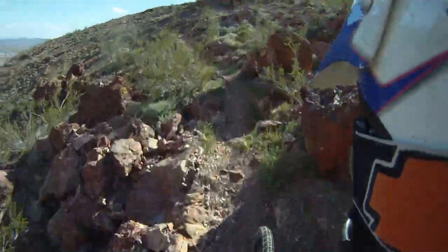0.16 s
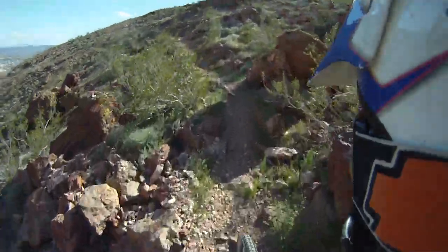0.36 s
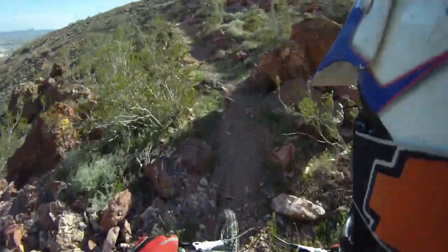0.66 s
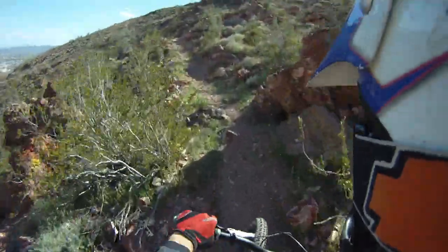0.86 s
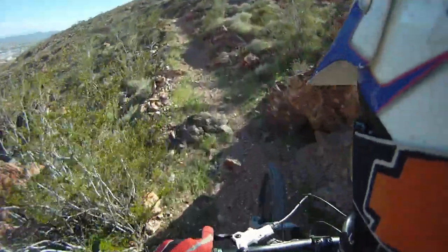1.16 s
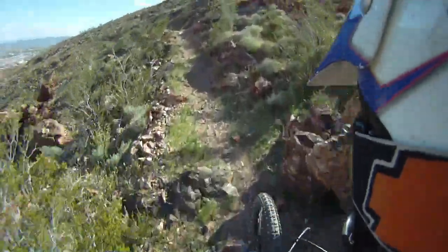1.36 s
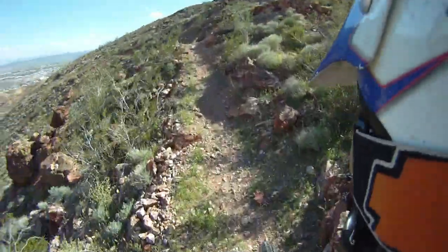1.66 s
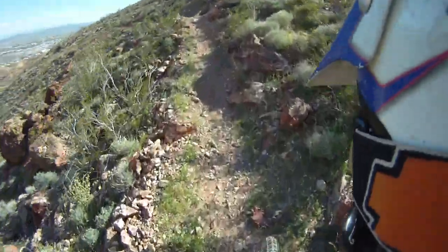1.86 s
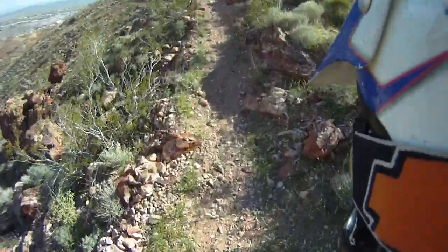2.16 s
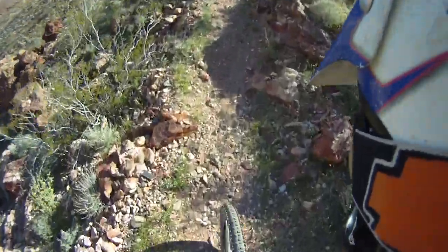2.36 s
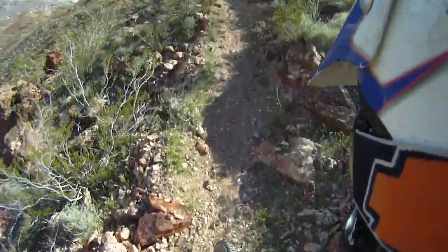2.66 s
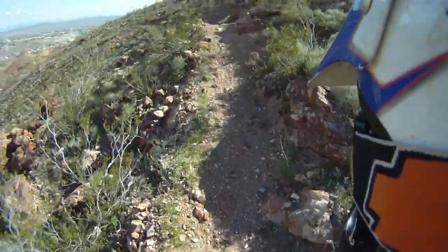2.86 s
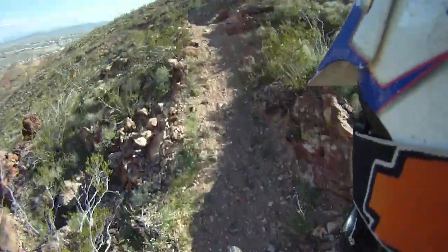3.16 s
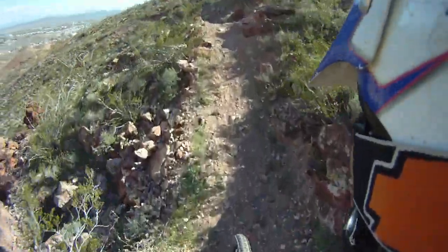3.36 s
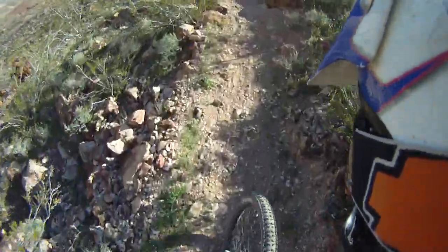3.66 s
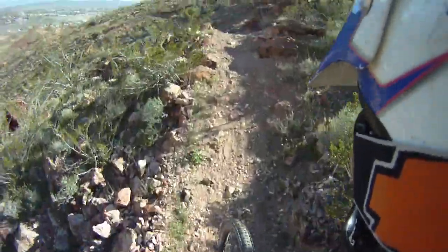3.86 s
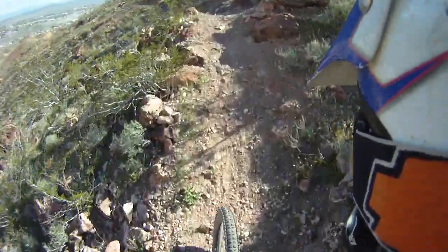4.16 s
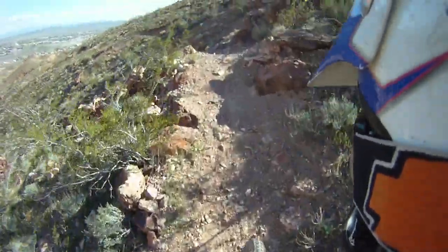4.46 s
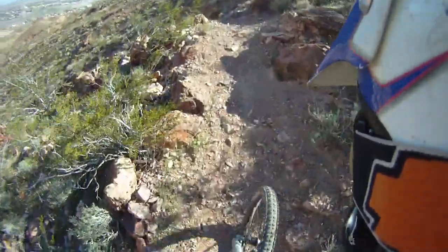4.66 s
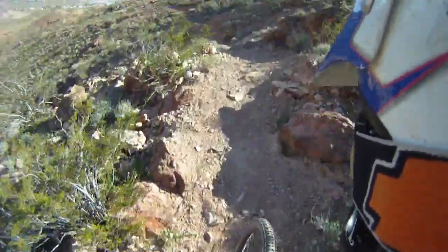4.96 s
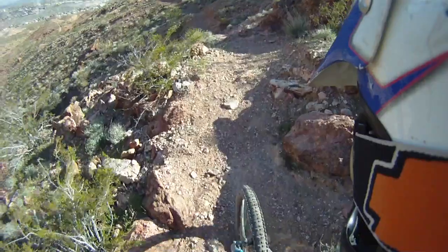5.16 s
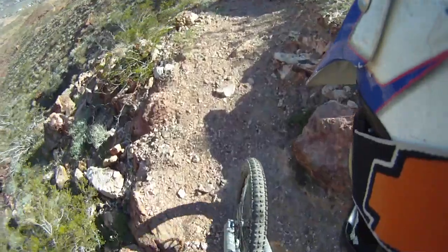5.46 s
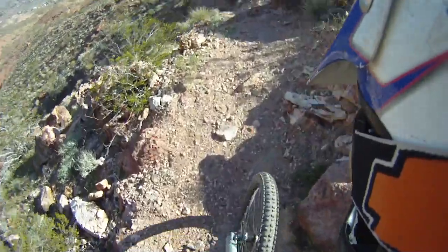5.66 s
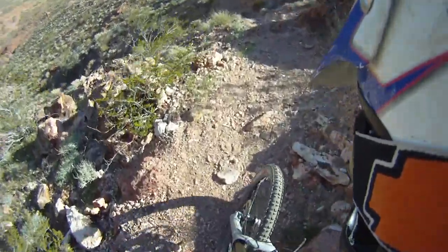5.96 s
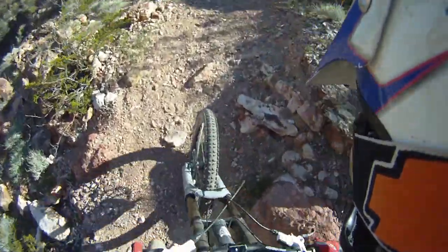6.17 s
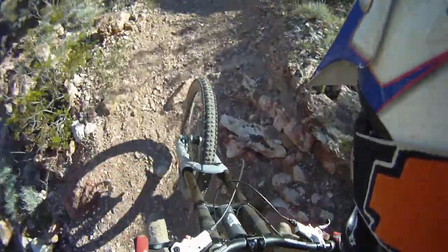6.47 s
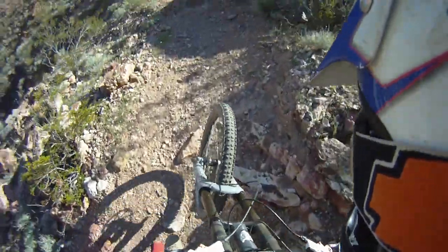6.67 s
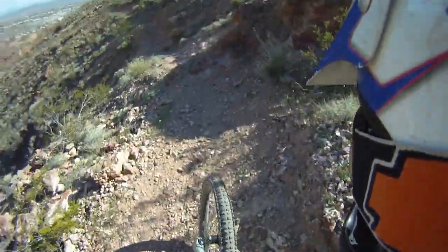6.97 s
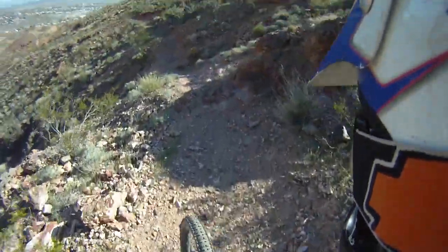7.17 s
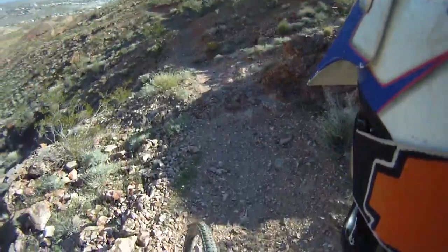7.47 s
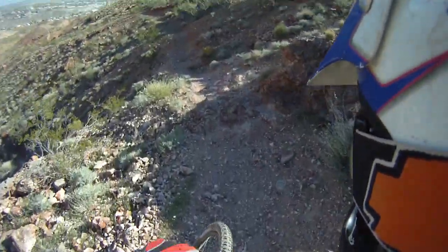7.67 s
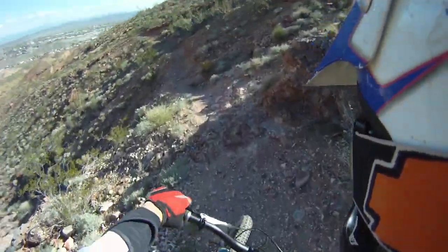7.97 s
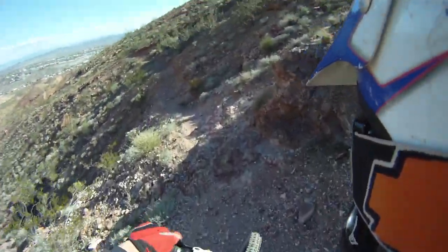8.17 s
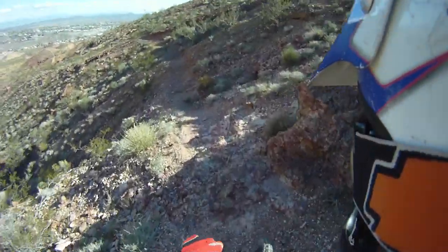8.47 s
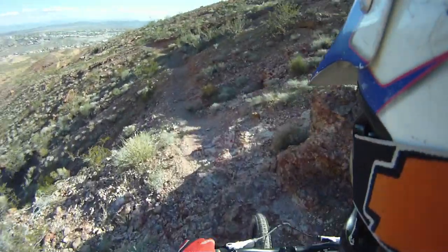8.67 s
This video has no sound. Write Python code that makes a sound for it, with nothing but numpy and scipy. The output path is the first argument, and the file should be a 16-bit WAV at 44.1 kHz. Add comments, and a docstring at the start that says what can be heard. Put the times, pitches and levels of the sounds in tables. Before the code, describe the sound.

From a camera on a rider's helmet, low uneven wind rumble dominates while mountain bike tyres crunch faintly over gravel. Pebbles tick, frame and chain clatter in short flurries, and stones snap under the tyres. A loud crack and thud come around six seconds, with a brief thin brake squeak, then another deep jolt near eight. Open dry hillside, no echo, gritty narrow sound.

```python
"""Mountain bike on a rocky trail

Heard from a camera on the rider's helmet. Tyres crunch through gravel: clustered noise grains and clicks.
Stones snap as short decaying sines, chain and frame rattle in filtered flurries, brake discs squeak briefly.
The camera housing is a bank of resonances over the crunch, rattles and stones; wind and jolts
drive its mount as low-frequency modes, under a rush of filtered noise."""
import sys
import numpy as np
from scipy import signal
from scipy.fft import rfft, irfft
from scipy.io import wavfile
from scipy.ndimage import uniform_filter1d

SR = 44100
rng = np.random.default_rng(int(sys.argv[2]) if len(sys.argv) > 2 else 0)


def wav_record(signal):
    """Record a signal, one row per channel, as 16-bit PCM in the file named by sys.argv[1]."""
    frames = np.transpose(np.atleast_2d(signal))
    bounded = np.clip(frames, -1, 1)
    # unit amplitude maps onto the largest positive 16-bit level
    quanta = np.round(bounded * 32767).astype(np.int16)
    wavfile.write(sys.argv[1], SR, quanta)


N = 388521  # length in samples

# Tyres on gravel, following speed and the looseness of the ground.
# Each row: time in seconds, crunch level in dB, extra level of fine grit in dB.
ROLL = [(0, -55.5, 4), (.4, -57, 3.5), (.47, -58, 6), (.68, -56, 4.5), (.88, -57, 6), (1.05, -56.5, 7),
        (1.25, -59, 1.5), (1.42, -58.5, 1), (1.8, -59, 1), (2.14, -63, 4.5), (2.35, -62, 5), (3.15, -58, 1),
        (3.29, -69, 10), (3.7, -61, 4.5), (4.0, -62.5, 5.5), (4.95, -59.5, 3.5), (5.2, -65.5, 5.5),
        (5.4, -61, 10.5), (6.12, -61, -0.5), (6.7, -67, 5), (6.85, -60.5, 0), (6.93, -62, 1), (7.3, -59, 0),
        (7.56, -61, 0.5), (7.8, -58, 5), (8.0, -63.5, 7), (8.11, -61.5, 0), (8.23, -57.5, -0.5),
        (8.81, -61.5, 5)]


def undb(db):
    """Decibels to amplitude."""
    return 10 ** (np.asarray(db) / 20)


def unit(x):
    """Scale to an RMS of 1."""
    return x / np.sqrt(np.mean(x ** 2))


def curve(rows, axis=1):
    """One column of a table, joined by straight lines in time."""
    rows = np.asarray(rows)
    return np.interp(np.arange(N) / SR, rows[:, 0], rows[:, axis])


def low(x, hz, order=2):
    """Low-pass filter."""
    return signal.sosfilt(signal.butter(order, hz, fs=SR, output="sos"), x)


def band(x, lo_hz, hi_hz, order=2):
    """Band-pass filter."""
    return signal.sosfilt(signal.butter(order, [lo_hz, hi_hz], "band", fs=SR, output="sos"), x)


def ring(x, hz, width_hz):
    """One resonance, gain 1 at its centre."""
    return signal.lfilter(*signal.iirpeak(hz, hz / width_hz, fs=SR), x)


def colour(x, points):
    """Causal minimum-phase filter through (Hz, dB) points."""
    hz, db = np.transpose(points)
    log_bins = np.log(np.fft.rfftfreq(4096, 1 / SR) + 1)
    log_gain = np.log(undb(np.interp(log_bins, np.log(hz), db)))
    # folding the cepstrum onto positive times makes the filter causal
    cepstrum = irfft(log_gain)[:2048]
    cepstrum[1:] *= 2
    response = irfft(np.exp(rfft(cepstrum, 4096)))
    return signal.fftconvolve(x, response)[:len(x)]


def walk(rate):
    """Smooth random drift with an RMS of 1 that changes `rate` times a second."""
    k = int(SR / rate)
    steps = np.repeat(rng.standard_normal(N // k + 1), k)
    return unit(uniform_filter1d(steps, k)[:N])


def impacts(rate, spread_db, size):
    """Random tiny blows, `rate` a second: many weak, a few strong."""
    strength = undb(spread_db * np.minimum(rng.exponential(size=size), 4))
    struck = rng.random(size) < rate / SR
    return unit(struck * rng.choice([-1, 1], size) * strength)


def add(track, s, sound):
    """Mix a sound into the track from time s in seconds."""
    i = max(int(s * SR), 0)
    track[i:i + len(sound)] += sound[:N - i]


def housing(x, direct_db=-10):
    """Sound reaches the microphone through the ringing plastic case, and a little directly."""
    # Resonances of the camera housing. Each row: pitch in Hz, width in Hz, gain in dB.
    modes = [(968, 240, -11.5), (1165, 46, 0), (1763, 80, -6), (2190, 83, -1), (2406, 170, -5),
             (2870, 134, -4), (3656, 180, -5.5), (3626, 110, -5), (3858, 57, 3), (5190, 680, -4.5)]
    return undb(direct_db) * x + sum(undb(db) * ring(x, hz, width) for hz, width, db in modes)


def tyres(pebble_db=-5.0, crunch_db=0.5, patchy_db=3.23):
    """Knobs crush grit in quick clusters, coarse to fine grains each on their own; pebbles click out of it."""
    # Broad colour of the crunch. Each row: frequency in Hz, relative level in dB per Hz.
    gravel = [(150, -24), (400, -5), (700, 1.5), (1100, 2), (1450, 2.5), (2200, 2.5), (2900, 0),
              (3300, -8.5), (3850, -13), (4300, -12.5), (5400, -10.5)]
    clusters_db = 1.1 * walk(80) + 0.93 * walk(30)

    def grains():
        return impacts(rate=5000, spread_db=1.0, size=N) * undb(clusters_db + 2.0 * walk(40))

    coarse = low(grains(), 1450, order=3)
    medium = band(grains(), 1130, 3260)
    fine = band(grains(), 3380, 5160) * undb(curve(ROLL, axis=2))
    crunch = unit(housing(colour(coarse + medium + fine, gravel)))
    clicks = unit(housing(colour(pebbles(), gravel)))
    level_db = curve(ROLL) + crunch_db + patchy_db * walk(17)
    return (crunch + undb(pebble_db) * clicks) * undb(level_db)


def pebbles(rate=140, spread_db=3.0, ring_s=0.0045):
    """Loose pebbles click against each other, each at its own pitch; most are faint."""
    out, t = np.zeros(N), np.arange(SR // 50) / SR
    for when, size, pitch in rng.random((int(rate * N / SR), 3)):
        hz = 900 * 2 ** (2 * pitch)  # within two octaves
        strength = undb(-spread_db * np.log(max(size, .02)))
        add(out, when * N / SR, strength * np.sin(2 * np.pi * hz * t) * np.exp(-t / ring_s))
    return unit(out)


def chips(rate=110, chip_db=-11, spread_db=1.5, ring_s=0.0014, crack_db=-6, cluster_db=7.0):
    """Small sharp chips crack under the knobs: dry, bright ticks that come in clusters."""
    out, t = np.zeros(N), np.arange(SR // 100) / SR
    for when, size, pitch in rng.random((int(rate * N / SR), 3)):
        hz = 1600 * 2 ** (1.3 * pitch)
        tick = np.sin(2 * np.pi * hz * t) + undb(crack_db) * rng.standard_normal(len(t))
        strength = undb(-spread_db * np.log(max(size, .1)))
        add(out, when * N / SR, strength * tick * np.exp(-t / ring_s))
    clusters = undb(cluster_db * np.tanh(walk(40)))
    level_db = curve(ROLL) + curve(ROLL, axis=2) + chip_db
    return unit(housing(out * clusters, direct_db=-4.0)) * undb(level_db)


def rattles(rise_s=0.00039, tail_s=0.01):
    """Each bump sets off a dense flurry of small collisions: frame knock, hard clatter and chain jingle."""
    # Bumps that rattle chain and frame; sharp ones are bright, blunt ones dull.
    # Each row: start in seconds, length in seconds, clatter level in dB, brightness in dB.
    bumps = [(0.028, 0.029, -53.5, 6), (0.097, 0.014, -55, 12), (.172, 0.014, -58, -14),
             (0.205, 0.0067, -59, 6), (0.32, 0.015, -52, 3), (.42, 0.023, -58, 1),
             (.498, 0.023, -56.5, -17), (0.562, .008, -53.5, 7), (0.586, .005, -47.5, 10),
             (0.605, 0.0061, -48.5, -11), (.621, 0.015, -44, 10), (0.76, 0.01, -47, 4),
             (1.014, .012, -51.5, 11), (1.103, 0.016, -56, 3), (1.281, 0.0051, -56, -5),
             (1.626, 0.037, -52.5, -12), (1.858, 0.043, -53, -14), (1.904, 0.014, -46, -10),
             (2.558, 0.0034, -34.5, 2.5), (2.68, 0.0033, -47, -5), (2.698, 0.019, -50, 10),
             (2.742, 0.027, -50, 6.5), (2.863, 0.043, -55, 5), (3.043, 0.017, -57, -6),
             (3.107, 0.0038, -56.5, -15), (3.339, 0.022, -53, 1), (3.502, 0.062, -53, -5),
             (3.577, 0.042, -48, -4), (3.656, 0.0035, -50, -13), (3.76, 0.017, -54, 4),
             (3.796, 0.0069, -49, -4), (3.825, .005, -54, 0), (3.871, .004, -53, 1),
             (4.106, 0.047, -54.5, -14), (4.3514, 0.005, -49, -18), (4.665, 0.023, -48.5, -6.5),
             (4.729, 0.011, -52, -5), (4.785, 0.0087, -53, 2), (4.865, 0.0027, -63, -25),
             (4.893, .003, -54, -24), (4.924, 0.015, -53.5, 5), (5.036, 0.026, -62, -15),
             (5.358, 0.1, -51.5, -0.5), (5.42, 0.037, -48, -11), (5.468, .04, -61, -6),
             (5.498, 0.074, -56, -26), (5.58, 0.012, -55, -22), (5.625, 0.032, -62, -20),
             (6.46, 0.019, -58.5, 5), (7.322, 0.016, -60, -7), (7.423, 0.044, -51.5, -2),
             (7.594, 0.0067, -49, 13.5), (7.64, 0.0071, -52, 2), (7.736, 0.018, -54, 7),
             (7.788, 0.018, -55, -11), (7.855, 0.04, -56.5, 0), (8.278, 0.016, -59, 5),
             (8.518, 0.007, -54.5, -3), (8.557, 0.0059, -59.5, 22)]
    out, t = np.zeros(N), np.arange(SR // 6) / SR
    for s, length, db, bright_db in bumps + small_bumps():
        swell = np.minimum(t / rise_s, 1) * np.exp(-np.maximum(t - 0.71 * length, 0) / tail_s)
        blows = swell * impacts(rate=4200, spread_db=0.9, size=len(t))
        case = housing(blows) + frame(blows)
        # a brighter bump knocks less and jingles more
        knock_db = -7 - 0.46 * bright_db
        jingle_db = -11.5 + 0.83 * bright_db
        parts = ((290, 1270, knock_db), (1570, 2940, 0.91), (3350, 5300, jingle_db))
        flurry = sum(undb(part_db) * unit(band(case, lo, hi, order=3)) for lo, hi, part_db in parts)
        add(out, s, undb(db) * np.sqrt(np.mean(swell ** 2)) * flurry)
    return out


def small_bumps(rate=3, length_s=0.0078, above_db=1.5, spread_db=2, bright_spread_db=8):
    """Small stones jog the bike at random, harder where the tyres crunch louder; rows as in rattles()."""
    roll_db = curve(ROLL)
    rows = []
    for when, size, sharp in rng.random((int(rate * N / SR), 3)):
        level_db = roll_db[int(when * N)] + above_db + spread_db * (2 * size - 1)
        rows.append((when * N / SR, length_s, level_db, bright_spread_db * (2 * sharp - 1)))
    return rows


def frame(blows, vary_db=3, vary_pitch=0.051):
    """The frame rings a little differently wherever it is struck."""
    # Rings of the frame. Each row: centre pitch in Hz, width in Hz, centre gain in dB.
    frame_modes = [(1186, 22, 1.5), (2420, 100, -33), (2760, 160, -13), (3050, 53, -24)]
    chance = 2 * rng.random((len(frame_modes), 2)) - 1
    return sum(undb(db + vary_db * louder) * ring(blows, hz * (1 + vary_pitch * higher), width)
               for (hz, width, db), (louder, higher) in zip(frame_modes, chance))


def stones(crack_s=0.0029, case_db=-4):
    """A pinched stone snaps for a few cycles, one that hits the bike rings longer; both ring the housing."""
    # Stones snapping from under the tyre or knocking on the rim.
    # Each row: start in seconds, snap level in dB, pitch in Hz, crack relative to snap in dB,
    # ring decay in seconds.
    snaps = [(0.211, -44.5, 2180, -1, .0014), (.2643, -53, 2200, 2, .0014), (.345, -47, 1190, 0.5, 0.0016),
             (.589, -43, 1220, -8, 0.0034), (0.6286, -42, 1200, -11, 0.002),
             (.6345, -38, 3840, -22, 0.0034), (.7193, -48, 2200, -1.5, .0014),
             (0.7614, -45.5, 1128, 4.5, 0.011), (.9072, -40.5, 2110, -5.5, 0.0016),
             (0.9716, -40.5, 2220, -4, 0.0015), (1.0183, -44, 2120, -6, 0.0016),
             (1.1095, -50, 2180, -2, .0014), (1.239, -47, 1204, -7, .006), (1.287, -44, 2200, -15, 0.0019),
             (1.6282, -39, 2190, -27, 0.0015), (1.9047, -44, 1140, -39, 0.0042),
             (1.9854, -51, 2800, -18, 0.0022), (2.2326, -31, 2270, -18, 0.00093),
             (2.5391, -43, 1780, -18, .003), (2.5583, -38, 1215, -24, 0.01),
             (2.5595, -37, 2250, -20.5, 0.0044), (2.68, -40.5, 1510, -17, 0.0015),
             (2.682, -46, 2370, -21, .004), (2.7, -43.5, 2830, -12, 0.0077), (2.75, -45, 2570, -20, .005),
             (2.759, -44, 2910, -7, 0.0061), (3.1143, -44, 2040, -19, 0.0015),
             (3.198, -46, 2200, -8, .0014), (3.5129, -40, 2380, -19, 0.0022), (3.591, -46, 2330, -10, .003),
             (3.636, -48, 2200, -3, .0014), (3.6582, -33.5, 2020, -7.5, 0.0013),
             (3.775, -38.5, 1680, -16, .002), (3.7975, -50, 2080, -17, .003), (3.83, -46, 2280, -8, .0014),
             (4.3533, -46, 1090, -24, 0.0043), (4.3535, -46, 450, -32, 0.0012),
             (4.5705, -48, 1990, -17, 0.0018), (4.6683, -43.5, 2430, -14, .003),
             (4.7406, -59, 1110, -16, 0.0026), (4.8688, -45, 2300, -22, 0.0019),
             (4.894, -45, 2230, -18, .002), (4.911, -48, 3220, -8, .0014), (5.0404, -44, 1700, -16, 0.0016),
             (5.362, -42, 2200, -6, 0.0017), (5.596, -32, 2070, -17.5, 0.001),
             (5.6255, -52, 2200, -4, .0014), (5.756, -43, 2600, -9, 0.0018), (6.0628, -42, 2200, -9, .0014),
             (6.0963, -26, 2200, -13.5, 0.0011), (6.1009, -31, 2150, -36, 0.00084),
             (6.4592, -48, 2540, -15, .002), (6.947, -40, 2320, -26, 0.0011),
             (7.2948, -50, 2540, -38, 0.0016), (7.3163, -43, 2470, -24, 0.002),
             (7.4415, -45, 1170, -20, 0.006), (7.5502, -52, 3880, -8, .0014),
             (7.5936, -42, 4570, -21, .0014), (7.829, -43.5, 1880, -10, 0.0015),
             (7.933, -41, 2000, -3.5, 0.0013), (8.035, -47, 2850, -16, .003),
             (8.0495, -39, 1160, -21, 0.0026), (8.0505, -40, 2140, -13, 0.0028),
             (8.09, -46, 2170, -8.5, 0.0015), (8.5565, -60, 3920, -8, .0014), (8.583, -50, 2250, -6, .0014),
             (8.634, -48, 2260, -13, .0025), (8.6816, -52, 2270, -1, .003)]
    out, t = np.zeros(N), np.arange(SR // 20) / SR
    for s, db, hz, crack_db, ring_s in snaps:
        snap = np.sin(2 * np.pi * hz * t) * np.exp(-t / ring_s)
        crack = 2 * band(rng.standard_normal(len(t)), 1000, 9700) * np.exp(-t / crack_s)
        add(out, s, undb(db) * (snap + undb(crack_db) * crack))
    return out + undb(case_db) * housing(out)


def brakes(waver=0.012, rough_db=2.0):
    """Pads rub the discs into a thin squeak that swells, slides in pitch and fades."""
    # Brake discs singing. Each row: start in seconds, length in seconds, first pitch in Hz,
    # last pitch in Hz, level in dB.
    squeaks = [(5.415, .05, 5470, 5490, -65), (5.52, .06, 5490, 5470, -71), (6.035, .025, 2200, 2200, -57),
               (6.06, .08, 2200, 2200, -63), (6.11, .03, 4800, 4830, -70), (6.14, .04, 5030, 5080, -72),
               (6.16, .05, 4830, 4780, -73)]
    out = np.zeros(N)
    pitch, grip = 1 + waver * walk(400), undb(rough_db * walk(140))
    for s, length, from_hz, to_hz, db in squeaks:
        i = int(s * SR) + np.arange(int(length * SR))
        hz = np.linspace(from_hz, to_hz, len(i)) * pitch[i]
        tone = np.sin(2 * np.pi * np.cumsum(hz) / SR)
        add(out, s, undb(db) * unit(tone * grip[i] * signal.windows.cosine(len(i))))
    return out


def jolts(hz=62, rise_s=0.019, thud_db=-25):
    """A hard bump rings the stiffer mode of the camera mount, with a dull thud above it."""
    # Hard jolts that kick the mount. Each row: start in seconds, level before the fade in dB,
    # decay in seconds.
    kicks = [(1.01, -36, 0.045), (6.083, -22.5, 0.06), (6.33, -39, .06), (8.06, -20.5, 0.023)]
    out, t = np.zeros(N), np.arange(SR) / SR
    for s, db, decay_s in kicks:
        thud = undb(thud_db) * unit(band(rng.standard_normal(len(t)), 112, 134))
        fade = (1 - np.exp(-t / rise_s)) * np.exp(-t / decay_s)
        add(out, s, undb(db) * fade * (np.sin(2 * np.pi * hz * t) + thud))
    return out


def wind(sway_hz=28.66, wander_hz=2.7, flutter_db=2.5, buffet_flutter_db=1.0,
         drift_db=-12, rush_db=-59.5, mount_hz=67):
    """Gusts sway the camera's soft mount, rough ground its stiffer mode; air rushes over the helmet."""
    # Steady buffeting of the camera. Each row: time in seconds, sway level in dB.
    buffeting = [(0, -33), (.65, -32.5), (1.45, -36), (1.66, -40), (1.92, -44), (2.02, -36.5),
                 (2.55, -42.5), (2.9, -34.5), (3.08, -45), (3.2, -32.5), (3.6, -36), (3.87, -42.5),
                 (4.1, -35), (4.33, -44), (4.5, -35.5), (5.1, -43), (5.3, -33), (5.4, -41.5), (5.6, -35),
                 (6.15, -32), (6.47, -40.5), (6.57, -36), (6.7, -37), (7.1, -34), (7.45, -38.5),
                 (7.65, -37.5), (8.1, -33), (8.47, -43.5), (8.65, -33.5), (8.81, -43)]
    # Rough ground shaking the stiffer mode of the mount. Each row: time in seconds, level in dB.
    shudder = [(0, -45), (.2, -57), (.45, -48), (.6, -53), (.8, -46.5), (1.3, -46), (1.38, -60), (1.5, -57),
               (1.9, -62), (2.1, -53), (2.7, -54), (2.8, -44.5), (2.97, -48), (3.15, -61), (3.6, -52),
               (4.25, -61), (4.75, -51), (5.42, -61), (5.6, -43.5), (5.75, -53), (5.95, -44), (6.35, -45),
               (6.5, -52), (7.75, -51), (7.9, -46), (8.15, -56), (8.28, -63), (8.55, -50), (8.72, -45),
               (8.81, -49)]
    # Rush of air over the helmet. Each row: frequency in Hz, relative level in dB per Hz.
    air = [(40, -24), (90, 3), (120, 1.5), (160, -4), (220, -7), (420, -9), (700, -16), (1200, -14.5),
           (2500, -18), (5500, -29)]

    wind_db, lurch = curve(buffeting), swing()
    surge_db = 10 * np.log10(1 + (lurch / undb(wind_db)) ** 2)
    drift = undb(drift_db) * shake(hz=13.7, width_hz=9.6, even_s=0.37)
    main_sway = low(shake(hz=26.58, width_hz=12.0, even_s=0.1), 45.3, order=3)
    sway = (main_sway + drift) * undb(wind_db + flutter_db * walk(12))

    # a lurch takes over from the random sway and swings the mount almost purely at its own pitch
    lurch_hz = sway_hz + wander_hz * walk(8.1)
    lurch_tone = unit(np.sin(2 * np.pi * np.cumsum(lurch_hz) / SR))
    sway = sway * undb(-surge_db / 2) + lurch * lurch_tone

    buffet_db = curve(shudder) + buffet_flutter_db * walk(20)
    buffet = undb(buffet_db) * shake(hz=62.5, width_hz=27, even_s=0.043)
    # the mount passes nothing much above its stiffer mode
    rumble = low(sway + buffet, mount_hz, order=7)

    gust_db = 0.1 * (wind_db - np.mean(wind_db)) + 0.1 * surge_db + 1.0 * walk(14)
    rush = unit(colour(rng.standard_normal(N), air)) * undb(rush_db + gust_db)
    return rumble + rush


def swing(fall=1.15):
    """How far lurches swing the camera: each dies `fall` times slower than it grows."""
    # Gusts and lurches that swing the camera further.
    # Each row: time of the peak in seconds, rise in seconds, peak level in dB.
    lurches = [(.08, 0.053, -29), (0.818, 0.045, -22), (1.11, 0.076, -24.5), (1.28, 0.14, -25.5),
               (1.8, 0.018, -38), (1.99, 0.039, -36.5), (2.17, 0.042, -36.5), (2.39, 0.077, -31),
               (2.77, 0.044, -33.5), (3.0, 0.021, -28), (3.28, 0.12, -37.5), (3.6, 0.048, -32),
               (4.09, 0.026, -33.5), (4.39, 0.039, -35), (4.76, 0.05, -25.5), (5.48, 0.051, -30.5),
               (5.66, 0.052, -30), (5.9, 0.075, -27.5), (6.11, 0.084, -26), (6.2, .03, -28),
               (6.33, 0.038, -27.5), (6.86, 0.036, -30.5), (7.489, 0.032, -30), (7.92, 0.06, -25.5),
               (8.131, 0.079, -19.5), (8.6, 0.047, -29.5)]
    t, power = np.arange(N) / SR, np.zeros(N)
    for s, rise_s, db in lurches:
        width_s = np.where(t < s, rise_s, rise_s * fall)
        power += (undb(db) * np.exp(-((t - s) / width_s) ** 2)) ** 2
    return np.sqrt(power)


def shake(hz, width_hz, even_s):
    """A mount mode pushed at random: its phase wanders while its strength stays nearly even."""
    push = rng.standard_normal(N + SR)  # the first second lets the mode settle
    motion = ring(ring(push, hz, width_hz), hz, width_hz)
    power = uniform_filter1d(np.abs(signal.hilbert(motion)) ** 2, int(even_s * SR))
    return unit((motion / np.sqrt(power))[SR:])


def scene():
    """Tyres, bike and stones up close, with wind and jolts shaking the camera, as one channel."""
    return (tyres() + chips() + rattles() + stones() + brakes() + wind() + jolts())[None]


def record(dry):
    """The camera samples at 12 kHz and holds each value, which mirrors the sound into a gritty treble."""
    narrow = low(dry, 5750, order=16)
    # up to 48 kHz, then every fourth value held for four samples
    samples = signal.resample_poly(narrow, 160, 147, axis=1)[:, ::4]
    held = np.repeat(samples, 4, axis=1)
    out = signal.resample_poly(held, 147, 160, axis=1)[:, :N]
    return signal.sosfilt(signal.ellip(10, .2, 70, 15500, fs=SR, output="sos"), out)


dry = scene()
out = record(dry)
wav_record(out)
```